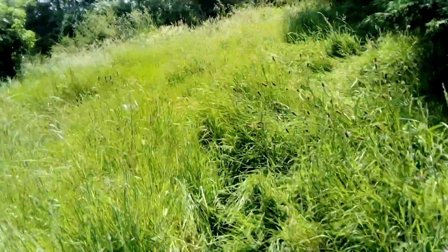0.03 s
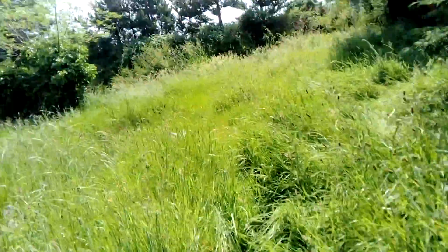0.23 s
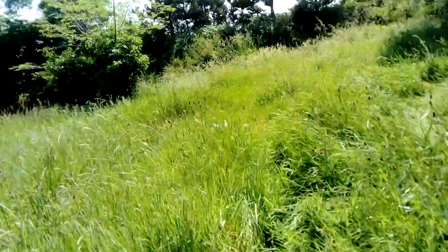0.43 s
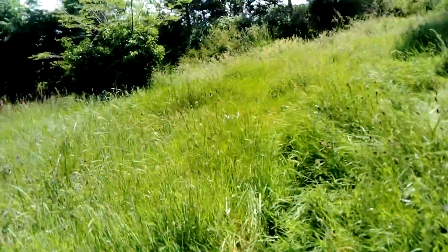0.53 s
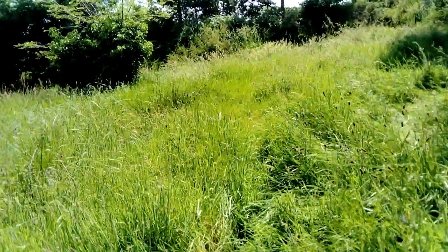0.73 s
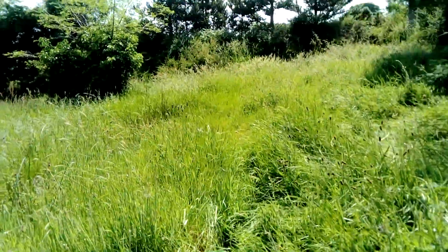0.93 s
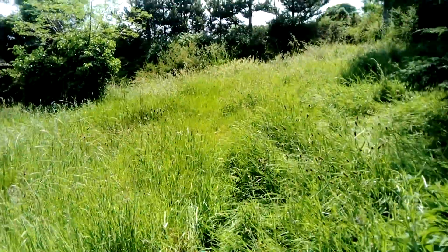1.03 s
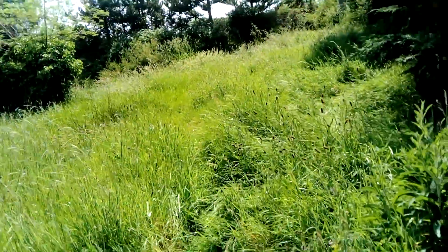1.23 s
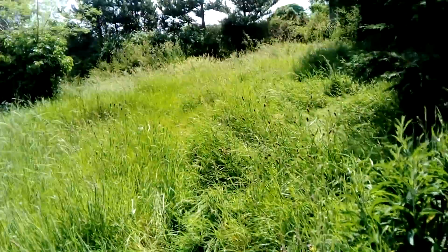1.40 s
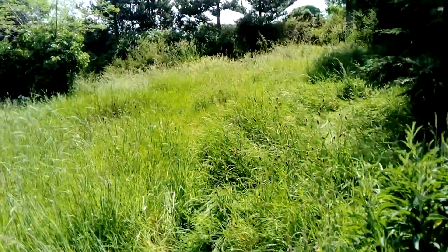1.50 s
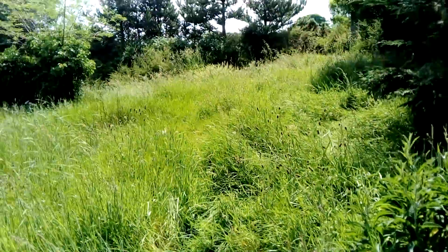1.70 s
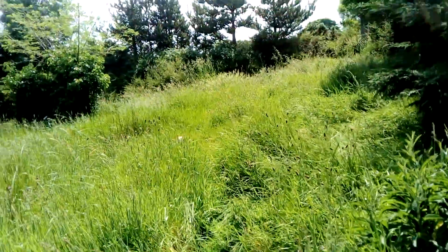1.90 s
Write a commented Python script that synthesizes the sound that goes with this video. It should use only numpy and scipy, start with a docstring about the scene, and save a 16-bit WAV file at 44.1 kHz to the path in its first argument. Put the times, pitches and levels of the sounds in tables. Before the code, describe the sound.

Long grass swishes and crunches close by in uneven strokes, with small dry stalk snaps scattered throughout, busiest from 0.5 to 1.5 seconds. Wind buffets the microphone with low thuds from 0.2 to 0.8 seconds, again at 1.1, and weakly near the end. A faint distant bird gives a falling whistle around 0.5 seconds; another chirps twice around 1.8. Far leaves hiss softly underneath.

```python
"""Long grass swishes and crunches close by on an open hillside, over a hiss of distant leaves.
Blades, stems and seed heads rub in many tiny contacts; dry stalks snap with a crack and a short ring.
Uneven gusts buffet the microphone: a low rumble, and a short thud for each eddy.
Far off are thin peeps, one bird's falling whistle and another's two chirps. A faint whine lingers."""
import sys
import numpy as np
from scipy import signal
from scipy.fft import rfft, irfft, next_fast_len
from scipy.io import wavfile
from scipy.ndimage import uniform_filter1d, map_coordinates

SR = 44100
rng = np.random.default_rng(int(sys.argv[2]) if len(sys.argv) > 2 else 0)


def store_wav(level_fs):
    """Save 16-bit WAV to argv[1]."""
    pcm = np.round(np.clip(np.atleast_2d(level_fs), -1, 1) * 32767)
    wavfile.write(sys.argv[1], SR, pcm.T.astype(np.int16))


N = 85995

# distant leaves: freq_hz, gain_db
LEAF_SPECTRUM = [(20, -4), (100, 8), (300, 4), (600, -6.5), (1100, 1), (1800, -13), (3500, -11.5),
                 (5200, 2), (6000, -1), (6700, -19), (7800, -25), (12000, -20), (15500, -19)]
# turbulence between eddies: time_s, level_db
RUMBLE_LEVELS = [(0, -74), (.13, -77), (.22, -54), (.33, -40.5), (.38, -54), (.45, -47.5), (.52, -43),
                 (.66, -44), (.74, -50), (.84, -54), (.91, -69.5), (.96, -71), (1.01, -76), (1.08, -49),
                 (1.15, -52.5), (1.19, -64.5), (1.27, -66), (1.34, -80), (1.43, -60.5), (1.51, -82),
                 (1.64, -77.5), (1.73, -58), (1.95, -59.5)]
# turbulence: freq_hz, gain_db
RUMBLE_SPECTRUM = [(20, -21), (36, -11.5), (52, 3.5), (75, 5), (110, -5.5), (170, -11.5), (280, -23.5),
                   (500, -30), (850, -36), (1300, -73), (2000, -120)]
# eddies hitting the microphone: centre_s, peak_db, core_pitch_hz, half_length_s
WIND_EDDIES = [(0.206, -45.5, 94, 0.023), (0.253, -39.5, 103, 0.014), (.283, -29, 104, 0.011),
               (.301, -29.5, 221, 0.0032), (0.328, -28, 137, 0.0042), (.342, -39.5, 113, 0.01),
               (.411, -24.5, 93.5, 0.0098), (.412, -46.5, 243, 0.0048), (.492, -30, 112, 0.0087),
               (.508, -42.5, 240, 0.0078), (.529, -37, 166, 0.0147), (0.546, -44, 80, 0.0049),
               (.594, -30, 140, 0.013), (0.604, -35, 304, 0.0062), (.607, -27.5, 166.6, 0.0078),
               (0.616, -39, 113, 0.0091), (0.701, -32.5, 93.5, 0.009), (0.966, -55, 68, 0.01),
               (1.078, -45.5, 128, 0.016), (1.092, -38.5, 100, 0.011), (1.135, -39.5, 103, 0.005),
               (1.731, -52, 75, 0.0064), (1.758, -48.5, 95.5, 0.0089), (1.876, -45.5, 100, 0.0086),
               (1.926, -53, 143, 0.0077)]
# grass brushing: time_s, blades_db, stems_db
BRUSH_LEVELS = [(0.0, -56.5, -61), (0.1, -61.5, -63.5), (0.148, -55.5, -61.5), (0.195, -61.5, -63),
                (0.298, -74, -81), (0.52, -67, -71.5), (0.586, -59, -53), (0.64, -61.5, -66),
                (0.685, -54, -55.5), (0.716, -55, -49), (0.745, -55.5, -56.5), (0.82, -60, -63.5),
                (0.866, -56, -59.5), (0.985, -66, -68), (1.115, -56.5, -65.5), (1.18, -60, -66),
                (1.213, -58, -68), (1.265, -66, -68), (1.305, -59.5, -65.5), (1.365, -60, -66),
                (1.44, -57.5, -64), (1.53, -62, -67), (1.726, -61.5, -70), (1.758, -66.5, -68),
                (1.79, -65.5, -70), (1.846, -75.5, -69.5), (1.95, -75, -71.5)]
# rubbing blades: freq_hz, gain_db
BLADE_SPECTRUM = [(200, -65), (900, -15), (2000, -17), (3200, -3), (4500, 0), (6200, 2), (6900, -3),
                  (7800, -14.5), (10000, -59), (16000, -26)]
# rubbing stems: freq_hz, gain_db
STEM_SPECTRUM = [(100, -32), (400, -6.5), (800, -9.5), (1500, -2.5), (2200, 1), (3000, -3), (4500, -11.5),
                 (7000, -29), (8500, -63), (12000, -120)]
# seed-head hiss: time_s, relative_db
TIP_LEVELS = [(0, -69), (.09, -74), (.175, -70.5), (.24, -87), (.42, -89.5), (.50, -78.5), (.60, -81),
              (.668, -74), (.684, -66), (.76, -68.5), (.84, -75), (.99, -83.5), (1.13, -77.5),
              (1.28, -81.5), (1.34, -76), (1.46, -74.5), (1.56, -81), (1.69, -73), (1.75, -82), (1.85, -90),
              (1.95, -88)]
# seed-head hiss: freq_hz, gain_db
TIP_SPECTRUM = [(3000, -37), (6500, 10.5), (8000, 5), (10000, 4), (12500, 1.5), (15500, -3)]
# bending stalks: time_s, level_db
CRUNCH_LEVELS = [(0, -79), (.09, -66.5), (.14, -57.5), (.195, -57.5), (.24, -81), (.39, -90), (.44, -71.5),
                 (.52, -88), (.55, -62.5), (.59, -56), (.63, -65.5), (.72, -60), (.80, -60.5), (.91, -57.5),
                 (.99, -64.5), (1.05, -74.5), (1.14, -65), (1.27, -89), (1.30, -67), (1.41, -68.5),
                 (1.71, -77.5), (1.758, -62), (1.80, -69.5), (1.95, -85)]
# bending stalks: freq_hz, gain_db
CRUNCH_SPECTRUM = [(200, -32), (550, -13.5), (800, -8.5), (1080, -3), (1300, -6.5), (1700, -41),
                   (4000, -74), (8000, -120)]
# snapping stalks: start_s, relative_db, pitch_hz, t60_s, crack_over_ring_db
STALK_SNAPS = [(.149, -42.5, 2170, 0.013, -11), (.395, -47, 610, 0.012, -13),
               (.429, -47.5, 1620, 0.014, -3.5), (.543, -38.5, 770, 0.03, 0),
               (0.714, -36.5, 2120, 0.016, -0.5), (0.778, -46.5, 1090, 0.021, 6),
               (.834, -41, 920, 0.027, 4), (.851, -30.5, 1024, 0.016, -9.5), (0.865, -44, 2500, 0.005, 6),
               (.901, -38.5, 1050, 0.041, -22), (.921, -45, 1160, 0.012, -7),
               (0.9284, -36, 1110, 0.026, -9), (0.929, -41, 3090, 0.021, -4),
               (0.962, -43.5, 1054, 0.037, -20), (1.1957, -24.5, 3440, 0.0029, -20),
               (1.3195, -46.5, 6640, 0.0045, 0), (1.3287, -44, 3400, 0.0071, 3),
               (1.389, -33.5, 1115, 0.016, -0.5), (1.3897, -34, 5350, 0.005, -4.5),
               (1.488, -43, 1360, 0.023, -22), (1.492, -43.5, 900, 0.013, -18),
               (1.625, -41.5, 5010, 0.015, -3.5), (1.73, -48, 2620, 0.0055, 2.5),
               (1.755, -39, 590, 0.018, -8)]
# crack of a stalk: freq_hz, gain_db
CRACK_SPECTRUM = [(200, -46), (900, -1), (3000, 2.5), (6300, -1.5), (8000, -12.5), (11000, -41),
                  (15000, -27)]
# thin calls far up the slope: centre_s, half_length_s, pitch_hz, level_db
FAR_PEEPS = [(0.344, 0.1, 5870, -75.5), (0.602, 0.024, 5900, -73)]
# first bird's whistle: time_s, pitch_hz, level_db
WHISTLE_CONTOUR = [(.385, 4750, -77), (.40, 4890, -62), (.432, 5020, -68), (.45, 4750, -75),
                   (.468, 4350, -65), (.49, 4220, -63), (.525, 4120, -65), (.58, 4120, -66),
                   (.66, 4130, -87)]
# thin high whine: time_s, level_db
WHINE_LEVELS = [(.84, -110), (.92, -90), (1.3, -95), (1.95, -99)]
# second bird's chirps: centre_s, level_db
BIRD_CHIRPS = [(1.756, -55), (1.880, -58.5)]


def amp(db):
    """Decibels to gain."""
    return 10 ** (np.asarray(db) / 20)


def unit(x):
    """Scale to rms 1."""
    return x / np.sqrt(np.mean(x ** 2) + 1e-20)


def clock():
    """Sample times in seconds."""
    return np.arange(N) / SR


def curves(rows):
    """Interpolate each column after time_s to one value per sample."""
    time_s, *columns = np.transpose(rows)
    return [np.interp(clock(), time_s, column) for column in columns]


def wobble(rate_hz):
    """Smooth random curve, rate_hz knots a second."""
    return map_coordinates(rng.standard_normal(400), [clock() * rate_hz + 2], mode="mirror")


def filtered(x, response):
    """Apply the gain response(hz)."""
    size = next_fast_len(N + 8192)
    return irfft(rfft(x, size) * response(np.fft.rfftfreq(size, 1 / SR)), size)[:N]


def coloured(x, spectrum):
    """Shape x by a spectrum table, at rms 1."""
    freq_hz, gain_db = np.transpose(spectrum)
    return unit(filtered(x, lambda hz: amp(np.interp(np.log(hz + 1), np.log(freq_hz), gain_db))))


def patchy(x, depth_db):
    """Tufts sound at different pitches: random gain patches in time and frequency, at rms 1."""
    bins = signal.stft(x, nperseg=512)[2]
    patches = uniform_filter1d(rng.standard_normal(bins.shape), size=4, axis=0)
    patches = uniform_filter1d(patches, size=9, axis=1)
    return unit(signal.istft(bins * amp(depth_db * unit(patches)), nperseg=512)[1][:N])


def leaves(level_db=-70.5):
    """Distant leaves merge into a patchy hiss."""
    return amp(level_db) * patchy(coloured(rng.standard_normal(N), LEAF_SPECTRUM), depth_db=4.0)


def rustle(spectrum, rate_hz, spread_db, rubbing, clump_db):
    """Tiny random contacts over smooth rubbing, in clumps."""
    contacts = (rng.random(N) < rate_hz / SR) * rng.choice([-1, 1], N)
    sizes = amp(spread_db * np.minimum(rng.exponential(size=N), 4))
    force = unit(contacts * sizes) + rubbing * rng.standard_normal(N)
    clumps = amp(clump_db * wobble(110))
    return patchy(coloured(force * clumps, spectrum), depth_db=1.94)


def grass(lift_db=0.9):
    """Blades, stems and tips brush past each other; bent stalks crunch."""
    blades_db, stems_db = curves(BRUSH_LEVELS)
    tips_db, = curves(TIP_LEVELS)
    crunch_db, = curves(CRUNCH_LEVELS)
    blades = rustle(BLADE_SPECTRUM, rate_hz=2300, spread_db=0.0, rubbing=0.97, clump_db=0.5)
    stems = rustle(STEM_SPECTRUM, rate_hz=900, spread_db=0.5, rubbing=1.0, clump_db=1.0)
    tips = rustle(TIP_SPECTRUM, rate_hz=4200, spread_db=0.5, rubbing=0.74, clump_db=1.1)
    crunch = rustle(CRUNCH_SPECTRUM, rate_hz=500, spread_db=1.0, rubbing=1.0, clump_db=0.5)
    return (amp(blades_db) * blades + amp(stems_db + lift_db) * stems
            + amp(tips_db + lift_db) * tips + amp(crunch_db) * crunch)


def wind(steepness=2.52, cusp=1.29, trail=0.21, haste=0.34):
    """Each eddy shoves the diaphragm for a few cycles, over a restless rumble."""
    rumble_db, = curves(RUMBLE_LEVELS)
    out = amp(rumble_db) * coloured(rng.standard_normal(N), RUMBLE_SPECTRUM)
    for centre_s, peak_db, pitch_hz, half_s in WIND_EDDIES:
        t = clock() - centre_s
        reach_s = half_s * (1 + trail * np.sign(t))  # fast in, slow out
        swell = np.exp(1 - (1 + steepness * (t / reach_s) ** 2) ** (cusp / 2))  # cusp 1 sharp, 2 round
        cycles = pitch_hz * (t + haste * half_s * np.tanh(t / half_s)) / (1 + haste)  # fastest at core
        out += amp(peak_db) * swell * np.sin(2 * np.pi * (cycles + rng.random()) + 0.43 * wobble(230))
    return out


def snaps(trim_db=-3.5, rise_cycles=0.51, knots_per_cycle=0.28, crack_t60_s=0.005):
    """A stalk gives way: a broad crack and a short dull ring."""
    out = np.zeros(N)
    for start_s, relative_db, pitch_hz, t60_s, crack_db in STALK_SNAPS:
        t = np.maximum(clock() - start_s, 0)
        jitter_rad = 0.69 * map_coordinates(rng.standard_normal(64), [t * pitch_hz * knots_per_cycle])
        envelope = (1 - np.exp(-t * pitch_hz / rise_cycles)) * amp(-60 * t / t60_s)
        ring = envelope * np.sin(2 * np.pi * pitch_hz * t + jitter_rad)
        burst = (t > 0) * amp(crack_db - 60 * t / crack_t60_s) * rng.standard_normal(N)
        crack = burst.std() * coloured(burst, CRACK_SPECTRUM)
        out += amp(relative_db + trim_db) * (ring + crack)
    return out


def peeps(waver=0.0018, octave_db=-15):
    """Faint far calls: high wavering notes with their octave."""
    out = np.zeros(N)
    for centre_s, half_s, pitch_hz, level_db in FAR_PEEPS:
        phase = 2 * np.pi * np.cumsum(pitch_hz * (1 + waver * wobble(150))) / SR
        envelope = amp(level_db) * np.exp(-((clock() - centre_s) / half_s) ** 2)
        out += envelope * (np.sin(phase) + amp(octave_db) * np.sin(2 * phase))
    return out


def whistle(flutter_db=2.8, waver=0.0074):
    """A bird's thin falling tone, fluttering through leaves."""
    pitch_hz, level_db = curves(WHISTLE_CONTOUR)
    gate = (clock() > WHISTLE_CONTOUR[0][0]) & (clock() < WHISTLE_CONTOUR[-1][0])
    envelope = gate * amp(level_db + flutter_db * wobble(140.2))
    phase = 2 * np.pi * np.cumsum(pitch_hz * (1 + waver * wobble(259.8))) / SR
    return envelope * np.sin(phase)


def tree_echo(x, level_db=-13, t60_s=0.43):
    """Direct sound plus a decaying tail scattered by trees."""
    tail = rng.standard_normal(N) * amp(-60 * clock() / t60_s)
    return x + amp(level_db) * signal.fftconvolve(x, tail / np.linalg.norm(tail))[:N]


def whine(pitch_hz=14980, width_hz=150):
    """Narrow noise band at the edge of hearing."""
    level_db, = curves(WHINE_LEVELS)
    band = filtered(rng.standard_normal(N), lambda hz: np.exp(-((hz - pitch_hz) / width_hz) ** 2))
    return amp(level_db) * unit(band)


def chirps(pitch_hz=2103, fall_hz_per_s=8800, half_s=0.013, upper_ratio=1.2, upper_db=-5.5):
    """A bird's raspy falling chirps, two voices at once."""
    out = np.zeros(N)
    for centre_s, level_db in BIRD_CHIRPS:
        t = clock() - centre_s
        phase = 2 * np.pi * (pitch_hz * t - fall_hz_per_s * t * t / 2) + 0.71 * wobble(320)
        envelope = amp(level_db) * np.exp(-(t / half_s) ** 2)
        out += envelope * (np.sin(phase) + amp(upper_db) * np.sin(upper_ratio * phase))
    return out


def scene():
    """Wind, grass and birds over distant leaves, mono."""
    hillside = leaves() + wind() + grass() + snaps()
    calls = tree_echo(whistle() + chirps()) + peeps()
    return (hillside + calls + whine())[None]


def record(dry, top_hz=15680):
    """Brick-wall low-pass."""
    return filtered(dry[0], lambda hz: hz < top_hz)[None]


dry = scene()
out = record(dry)
store_wav(out)
```